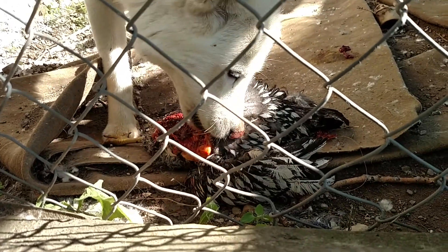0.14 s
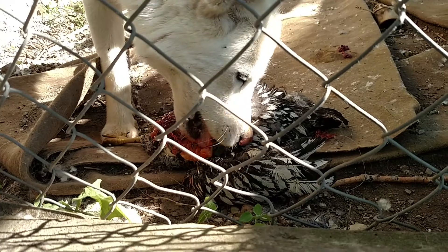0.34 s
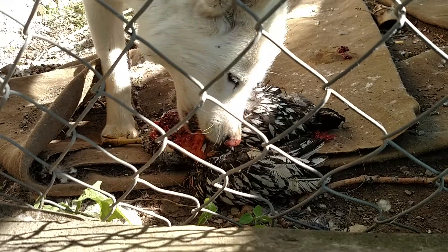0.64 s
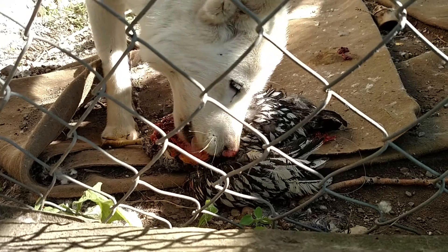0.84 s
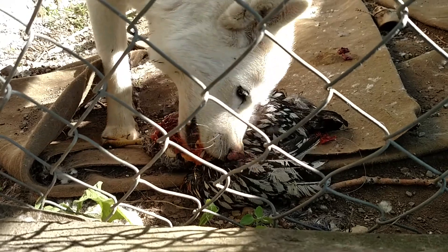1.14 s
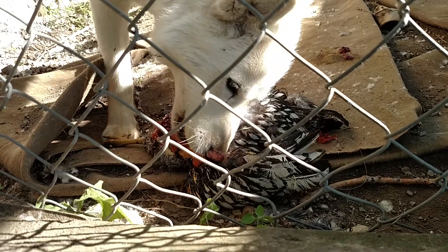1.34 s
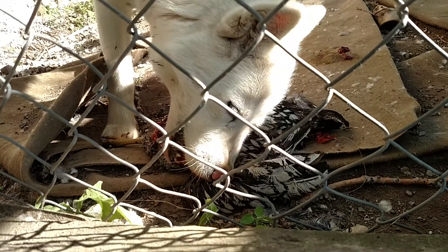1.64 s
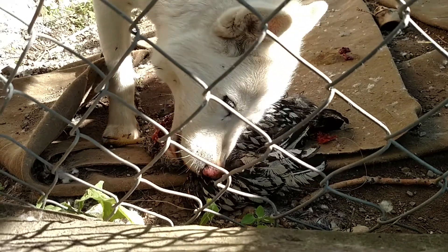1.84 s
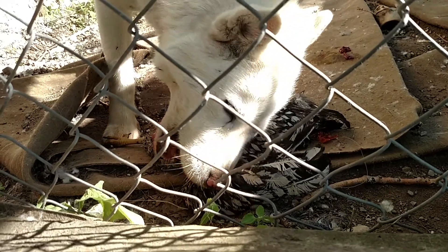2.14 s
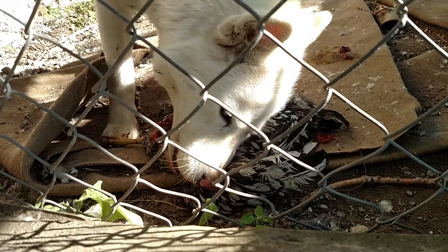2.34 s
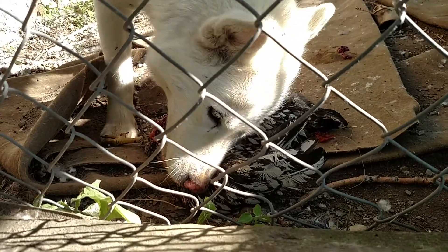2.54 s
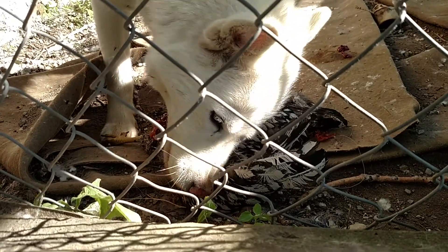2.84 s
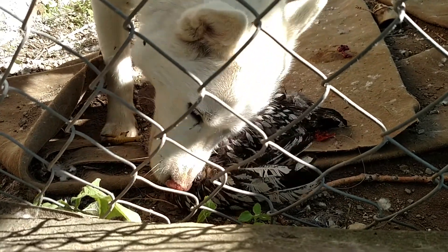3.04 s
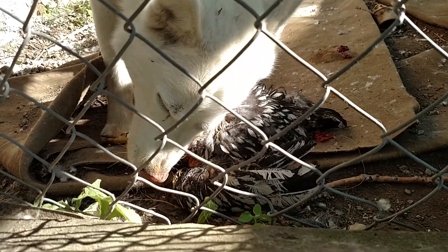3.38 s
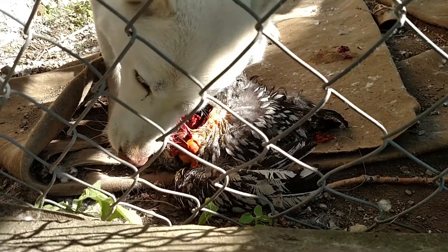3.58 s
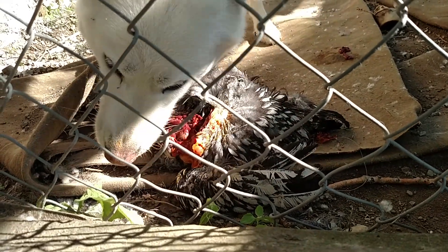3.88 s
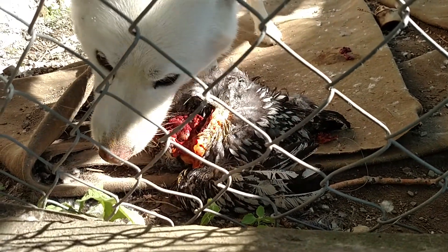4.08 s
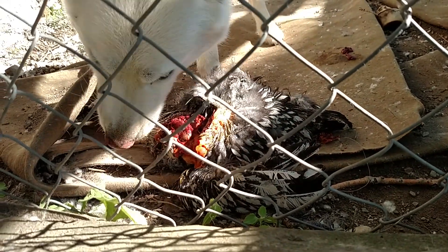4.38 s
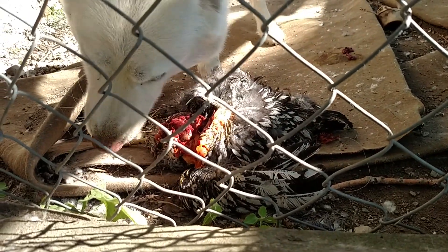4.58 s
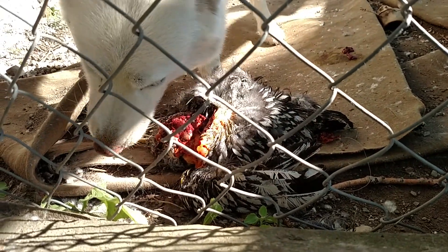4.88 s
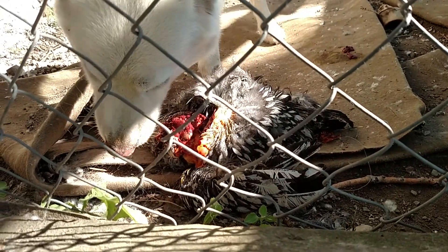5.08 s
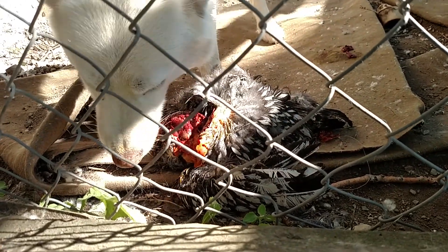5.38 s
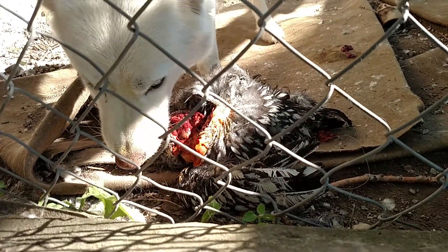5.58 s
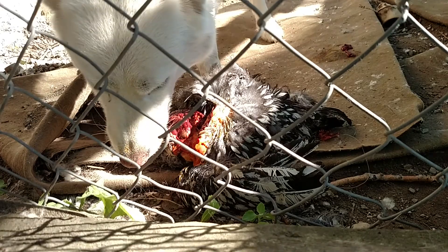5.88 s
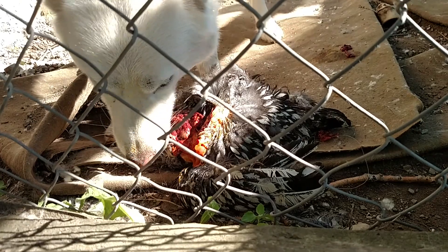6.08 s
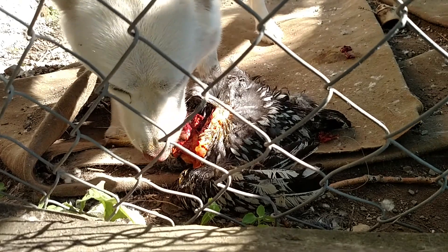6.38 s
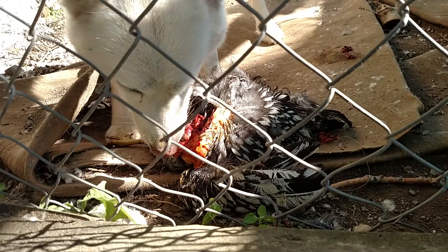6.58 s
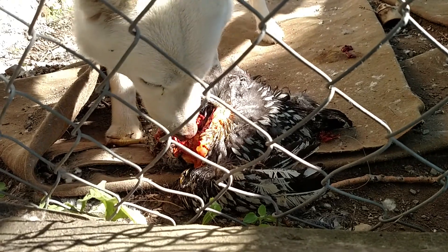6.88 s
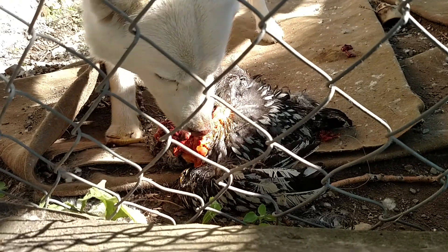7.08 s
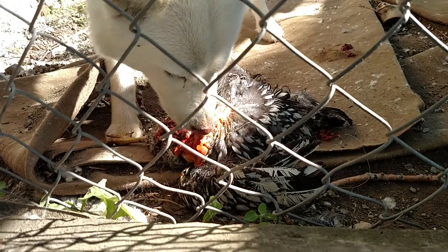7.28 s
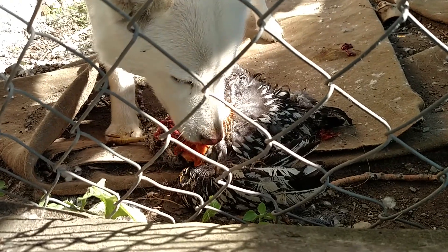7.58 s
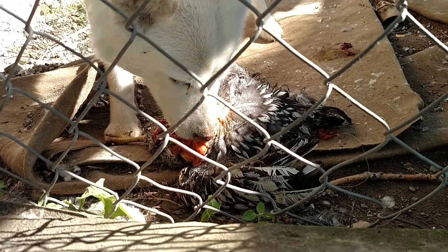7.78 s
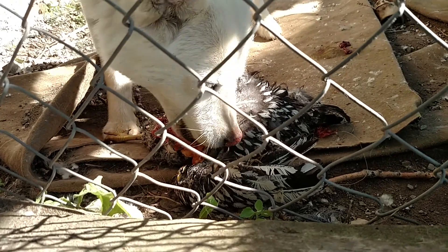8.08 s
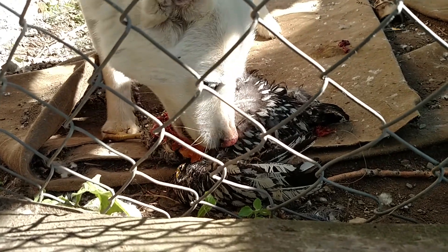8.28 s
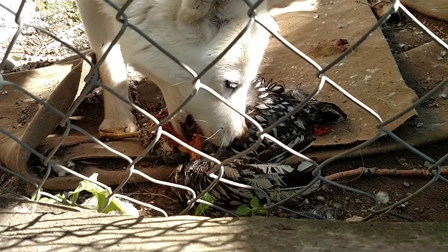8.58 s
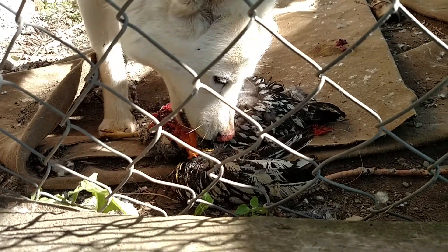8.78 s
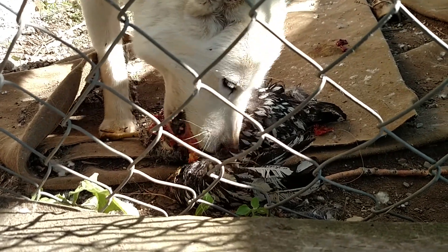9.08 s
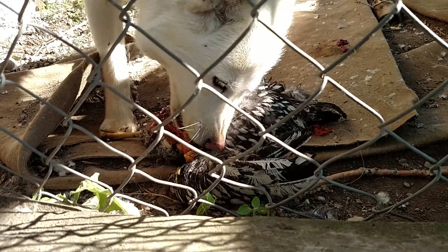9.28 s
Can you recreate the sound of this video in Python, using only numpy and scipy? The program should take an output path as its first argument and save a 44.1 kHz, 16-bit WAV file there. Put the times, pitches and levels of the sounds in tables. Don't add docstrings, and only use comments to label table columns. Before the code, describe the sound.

Irregular bone crunches and wet little mouth ticks from a feeding dog, above a constant fan and compressor drone with faint insect hiss.

```python
import sys
import numpy as np
from scipy import signal
from scipy.fft import rfft, irfft
from scipy.io import wavfile
from scipy.ndimage import uniform_filter1d

SR = 44100
rng = np.random.default_rng(int(sys.argv[2]) if len(sys.argv) > 2 else 0)


def to_wav(s):
    ch = np.atleast_2d(s).T
    pcm = np.round(np.clip(ch, -1, 1) * 32767)
    wavfile.write(sys.argv[1], SR, pcm.astype(np.int16))


def natural_amplitude(level_db):
    exponent = np.asarray(level_db, float) / 20
    return 10 ** exponent


N = 415863
T = np.arange(N) / SR
GRAIN_T = T[:2000]

BLADE_HZ, BLADE_COUNT = 86.225, 9
MAINS_HZ = 119.96


def curve(rows):
    points = np.array(rows)
    return np.interp(T, points[:, 0], points[:, 1])


def level(x, db):
    return x * natural_amplitude(db) / np.sqrt(np.mean(x ** 2))


def coloured(shape, lo_hz, hi_hz):
    hz = np.maximum(np.arange(N // 2 + 1) * SR / N, 1)
    shape = np.array(shape)
    db = np.interp(np.log(hz), np.log(shape[:, 0]), shape[:, 1])
    edge = 1 / (1 + (hz / hi_hz) ** 20) - 1 / (1 + (hz / lo_hz) ** 20)
    spectrum = rfft(rng.standard_normal(N)) * natural_amplitude(db) * np.sqrt(np.maximum(edge, 0))
    return irfft(spectrum, N)


def walk(rate):
    k = int(SR / rate)
    steps = np.repeat(rng.standard_normal(N // k + 1), k)
    return 1.3 * uniform_filter1d(uniform_filter1d(steps, k), k)[:N]


def ring(hz, t60, rise_s):
    rise = np.exp(-(GRAIN_T / rise_s) ** 2) - 1
    fall = np.exp(-np.log(1000) * GRAIN_T / max(t60, 0.002))
    return rise * fall * np.cos(2 * np.pi * hz * (GRAIN_T - rise_s))


def add(out, s, db, grain):
    i = int(s * SR)
    out[i:i + len(grain)] += (natural_amplitude(db) * grain / np.abs(grain).max())[:N - i]


def hum():
    # multiple, first fan level/dB rms, second fan level/dB rms, swell together at t/s
    fan_pair = [(2, -36.3, -46.5, 3.58), (3, -49.5, -55, 4.7), (4, -55.5, -46, 5.16),
                (5, -45.5, -54.5, 5.13), (6, -55, -71, 4.79)]
    # multiple, level/dB rms, wander/dB
    lone_fan = [(1, -58, -3.5), (8, -71, 4.5), (10, -67, 1), (11, -84, 9), (13, -71, 5), (14, -72.5, 1.5),
                (18, -70, 2), (20, -77, 4.5)]
    turn = 2 * np.pi * BLADE_HZ * T + 0.083 * walk(1.205)

    def slip(t):
        slip_hz, slip_hz_per_s = 0.126, 0.003
        return 2 * np.pi * (slip_hz * t + slip_hz_per_s * t ** 2 / 2)

    mains_db = -39 + 1.0 * walk(2.58) + 0.5 * walk(9)
    out = natural_amplitude(mains_db) * np.sin(2 * np.pi * MAINS_HZ * T)
    for multiple, db, twin_db, swell_s in fan_pair:
        k = int(round(multiple))
        phase = k * turn + 2 * np.pi * rng.random()
        first = natural_amplitude(db) * np.sin(phase)
        second = natural_amplitude(twin_db) * np.sin(phase + k * (slip(T) - slip(swell_s)))
        gust = natural_amplitude(0.8 * walk(12))
        out += gust * (first + second)
    for multiple, db, wander_db in lone_fan:
        phase = int(round(multiple)) * turn + 2 * np.pi * rng.random()
        out += natural_amplitude(db + wander_db * walk(3.057)) * np.sin(phase)
    return np.sqrt(2) * out


def rattle():
    # mains multiple, blade multiple, level/dB rms
    compressor = [(2, 0, -50.5), (3, 0, -66), (1, 1, -66), (2, 1, -60.5), (3, 1, -58), (3, 3, -72)]
    # multiple of the shaft rate, level/dB rms
    shaft = [(15, -55.5), (22, -63), (24, -55.5), (28, -53.5), (32, -56.5), (43, -64), (47, -58), (49, -69),
             (55, -69.5), (58, -73)]
    out = np.zeros(N)
    for m, k, db in compressor:
        hz = round(m) * MAINS_HZ + round(k) * BLADE_HZ
        out += natural_amplitude(db + walk(2)) * np.sin(2 * np.pi * (hz * T + rng.random()))
    for k, db in shaft:
        hz = round(k) * BLADE_HZ / BLADE_COUNT
        out += natural_amplitude(db + 3.4 * walk(1.454)) * np.sin(2 * np.pi * hz * T + 1.37 * walk(2.5))
    return np.sqrt(2) * out


def roar():
    # f/Hz, level/dB per Hz
    casing = [(20, -29), (45, -23.5), (70, -18.5), (100, -11.5), (138, -9), (162, 1), (178, -1.5),
              (195, -16.5), (245, -4), (300, -4), (340, -11.5), (370, -7), (410, -17), (455, -7),
              (490, -15.5), (640, -23)]
    edges_hz = [10, 110, 195, 330, 420, 640]
    out = np.zeros(N)
    for lo_hz, hi_hz in zip(edges_hz, edges_hz[1:]):
        out += natural_amplitude(0.22 * walk(3.3)) * coloured(casing, lo_hz, hi_hz)
    next_turn = np.roll(out, round(SR * BLADE_COUNT / BLADE_HZ))
    return level(out + 0.45 * next_turn, -39.5)


def rush():
    # f/Hz, level/dB per Hz
    hiss = [(640, 4.5), (760, 0.5), (950, 2.5), (1500, 1), (2000, -4.5), (2350, -6.5), (2750, -6.5),
            (3400, -2.5), (4500, -13.5), (5600, -13), (8500, -15.5), (10500, -21), (13500, -32),
            (15500, -27)]
    # t/s, level/dB
    chorus = [
        (0.0, -67.5),
        (1.05, -65.5),
        (3.47, -63),
        (5.67, -61.5),
        (7.51, -61.5),
        (9.43, -63),
    ]
    edges_hz = [640, 1300, 2000, 2800, 4300, 7000, 11000, 17000]
    insects = [0.11, 0.57, 0.9, 0.88, 0.99, 0.81, 0.1]
    swell_db = curve(chorus) - curve(chorus).mean()
    out = np.zeros(N)
    for lo_hz, hi_hz, share in zip(edges_hz, edges_hz[1:], insects):
        out += natural_amplitude(share * swell_db + 0.4 * walk(9)) * coloured(hiss, lo_hz, hi_hz)
    return level(out, -53)


def lens_motor():
    # f/Hz, peak level/dB, t60/s
    body = [(10380, -62.5, 0.017), (9800, -69, 0.012), (8620, -66, 0.014), (6900, -79, 0.0071),
            (11700, -78, .008)]
    frame_hz, first_tick_s = 30.03, 0.0095
    out = np.zeros(N)
    for n in range(int(T[-1] * frame_hz)):
        late, size = rng.standard_normal(2)
        s = first_tick_s + n / frame_hz + 0.0022 * late + 0.0007 * late ** 3
        for hz, db, t60 in body:
            a = rng.standard_normal()
            add(out, max(s, 0), db + 0.5 * size + 0.5 * a, ring(hz * (1 + 0.011 * a), t60, 0.002))
    return out


def lip_ticks():
    # t/s, peak level/dB, f/Hz
    lips = [(1.2284, -57, 5310), (1.957, -52, 7940), (2.383, -50, 5400), (2.4984, -54, 7300),
            (3.7114, -52, 6960), (6.3224, -52, 5550), (6.6538, -47, 8380), (0.4444, -60, 11400),
            (2.7731, -66, 11200), (3.0036, -66, 11200), (3.9759, -61, 11100), (4.2652, -67, 11600),
            (5.5438, -59, 11300), (6.7705, -66, 11100), (7.7363, -65, 11100)]
    out = np.zeros(N)
    for s, db, hz in lips:
        grain = ring(hz, 0.003, 0.0003) + 0.6 * ring(1.15 * hz, 0.0028, 0.00033)
        add(out, s, db, grain)
    return out


def bone_chips():
    # t/s, peak level/dB, f/Hz, t60/s
    chips = [(1.2311, -49, 2290, 0.01), (2.2638, -47, 2000, 0.01), (3.8207, -46, 2190, 0.01),
             (3.8492, -44, 3500, 0.01), (3.8496, -36, 2300, 0.019), (3.921, -45, 2390, 0.01),
             (4.2512, -44, 2210, 0.01), (4.6743, -37, 2270, 0.01), (4.6784, -42, 2720, 0.01),
             (4.6824, -40, 2360, 0.01), (4.6864, -36, 2400, 0.01), (4.6924, -42, 2140, 0.01),
             (4.9417, -45, 2030, 0.01), (5.015, -39.5, 3080, 0.0073), (5.037, -44, 2100, 0.01),
             (5.0494, -53, 3030, 0.01), (6.1195, -42, 2300, 0.01), (6.5427, -42, 2340, 0.0092),
             (6.655, -41, 2010, 0.01), (6.6794, -46, 3100, 0.01)]
    out = np.zeros(N)
    for s, db, hz, t60 in chips:
        grain = ring(hz, t60, 0.00074)
        grain += 0.4 * ring(1.23 * hz, 0.65 * t60, 0.00072)
        grain += 0.23 * ring(0.7 * hz, 0.71 * t60, 0.00077)
        add(out, s, db, grain)
    return out


def birds():
    # start t/s, end t/s, start f/Hz, end f/Hz, level/dB rms
    whistles = [(1.27, 1.29, 4900, 4850, -70), (1.29, 1.365, 7100, 7250, -71),
                (1.38, 1.43, 7250, 7200, -71), (1.397, 1.47, 7700, 7600, -68),
                (1.47, 1.53, 6850, 6750, -72), (2.179, 2.28, 3150, 3410, -65),
                (2.296, 2.5, 3650, 3610, -59.5), (2.5, 2.65, 3570, 3530, -60),
                (2.357, 2.65, 7200, 7050, -77), (3.405, 3.5, 7200, 7200, -68),
                (3.51, 3.55, 8100, 7800, -70), (3.55, 3.62, 7100, 6900, -72)]
    out = np.zeros(N)
    blur, flutter = walk(500), walk(450)
    trill = 1 + 0.2 * np.sin(2 * np.pi * 39.2 * T)
    for t0, t1, hz0, hz1, db in whistles:
        part = np.clip((T - t0) / (t1 - t0), 0, 1)
        hz = (hz0 + (hz1 - hz0) * part) * (1 + 0.0129 * blur)
        swell = np.sin(np.pi * part) ** 0.3 * trill * natural_amplitude(db + 2.9 * flutter)
        out += np.sqrt(2) * swell * np.sin(2 * np.pi * np.cumsum(hz) / SR)
    return out


def jaw_knocks():
    # t/s, peak level/dB, cavity f/Hz, t60/s
    knocks = [(1.495, -44, 703, 0.012), (1.863, -39, 915, 0.012), (1.8863, -41, 947, 0.012),
              (1.892, -32.5, 894, 0.02), (2.264, -34, 1030, 0.012), (2.333, -36, 1060, 0.012),
              (2.382, -25, 825, 0.006), (2.405, -38, 1060, 0.014), (2.438, -38, 1030, 0.014),
              (2.499, -24, 865, 0.0075), (2.788, -43, 864, 0.012), (3.616, -42, 1060, 0.012),
              (3.651, -34, 883, 0.012), (3.848, -43, 1190, 0.012), (3.873, -39, 1110, 0.012),
              (4.673, -42, 1190, 0.013), (4.685, -50, 880, 0.012), (4.691, -38, 1200, 0.012),
              (5.045, -42, 1170, 0.012), (5.617, -39, 861, 0.012), (6.298, -35, 1060, 0.011),
              (6.322, -38, 869, 0.012), (6.7123, -39, 883, 0.012), (6.861, -48, 869, 0.012),
              (7.09, -31, 850, 0.01)]
    out = np.zeros(N)
    for s, db, hz, t60 in knocks:
        grain = ring(hz, t60, 0.00104)
        grain += 0.21 * ring(0.76 * hz, t60, 0.0013)
        grain += 0.22 * ring(2.0 * hz, 0.59 * t60, 0.0011)
        add(out, s, db, grain)
    return out


def splinter_cracks():
    # t/s, peak level/dB, shard f/Hz, bone level/dB, spit level/dB
    cracks = [(1.8852, -35.5, 2000, -4, -14), (1.8903, -32, 1870, 1, -19), (2.3326, -42, 1380, 0, -23),
              (2.3424, -43, 1430, -6, -18), (2.379, -38, 1390, -6, -20), (2.4044, -42, 1700, -13, -15),
              (2.4383, -37.5, 1300, 7, -11), (2.5, -55, 1700, -6, -18), (3.947, -40, 1690, -9, -14),
              (3.9765, -33.5, 1580, -10, -18), (3.9948, -17.5, 2320, -3, -31), (4.0104, -40, 1450, -4, -17),
              (4.0196, -33.5, 1500, 0, -19), (6.296, -34.5, 1370, -2, -15), (6.3228, -38, 1590, 2, -23),
              (6.3859, -39.5, 1540, -6, -15)]
    # f/Hz, t60/s, level/dB
    bone = [(970, 0.005, 1), (1495, 0.0083, 2.5), (2270, 0.0064, 6.5), (3180, 0.0054, 6),
            (3680, 0.0046, -18), (5320, 0.0058, -7.5)]
    spit_band = signal.butter(3, [4500, 9000], "band", fs=SR, output="sos")
    spit_shape = (1 - np.exp(-GRAIN_T / 0.0003)) * np.exp(-GRAIN_T / 0.0016)
    out = np.zeros(N)
    for s, db, hz, bone_db, spit_db in cracks:
        grain = ring(hz, 20 / hz, 0.00064)
        for mode_hz, mode_t60, mode_db in bone:
            tune, size = rng.standard_normal(2)
            mode = ring(mode_hz * (1 + 0.013 * tune), mode_t60, 0.000685)
            grain += natural_amplitude(bone_db + mode_db + 2.4 * size) * mode
        spit = signal.sosfilt(spit_band, rng.standard_normal(len(GRAIN_T))) * spit_shape
        add(out, s + 0.00032, db + 3.0, grain)
        add(out, s + 0.00055, db + spit_db + 4.0, spit)
        add(out, s + 0.0005, db - 40, ring(12000, 0.0012, 0.0002))
    return out


def board_slap(chewing):
    return chewing + 0.13 * np.roll(chewing, int(0.003 * SR))


def scene():
    machine = hum() + rattle() + roar()
    chewing = lip_ticks() + bone_chips() + jaw_knocks() + splinter_cracks()
    mix = machine + rush() + lens_motor() + birds() + board_slap(chewing)
    return mix[None]


def band_limit(x):
    return signal.sosfilt(signal.butter(12, 16780, fs=SR, output="sos"), x)


def record(dry):
    top_cut = signal.ellip(12, 0.2, 60, 15540, fs=SR, output="sos")
    return band_limit(signal.sosfilt(top_cut, dry))


dry = scene()
out = record(dry)
to_wav(out)
```